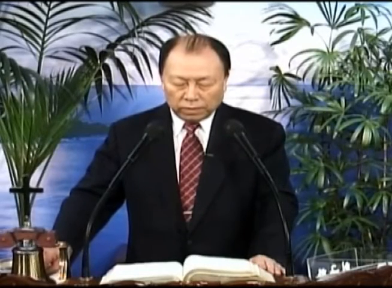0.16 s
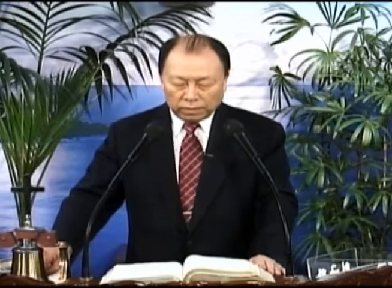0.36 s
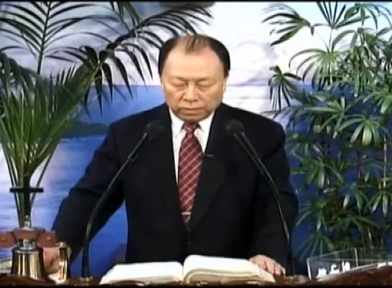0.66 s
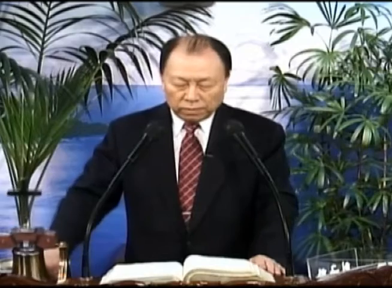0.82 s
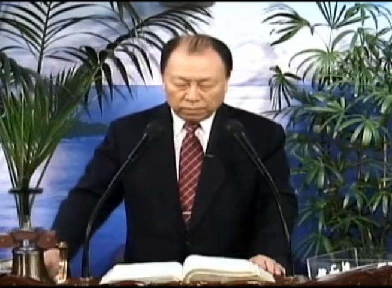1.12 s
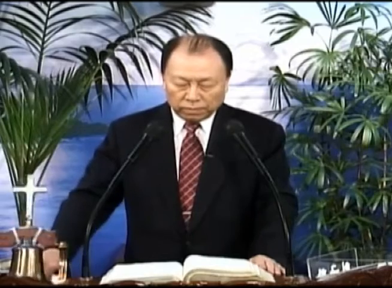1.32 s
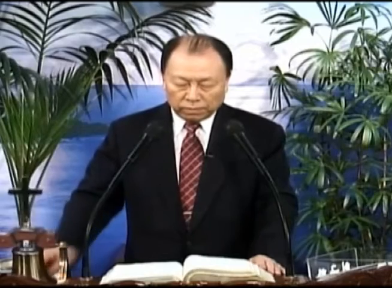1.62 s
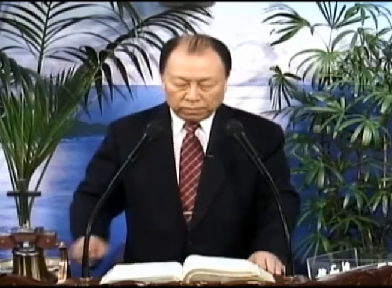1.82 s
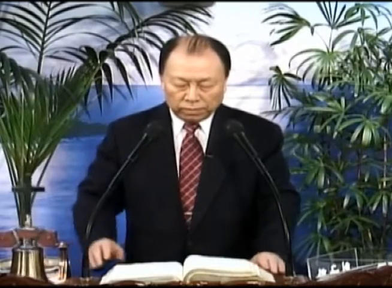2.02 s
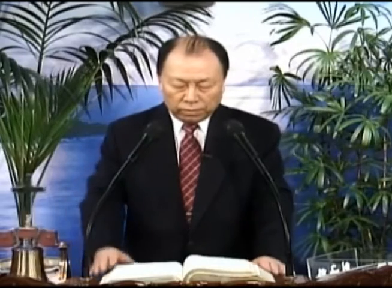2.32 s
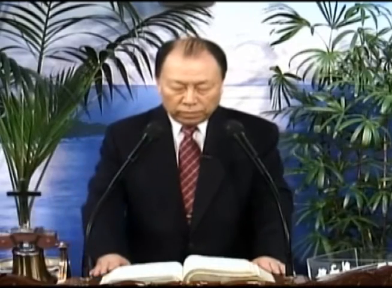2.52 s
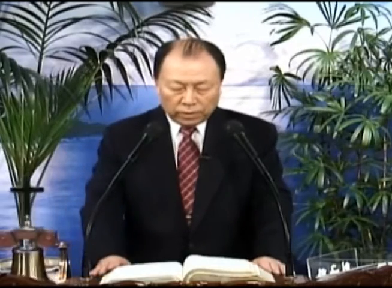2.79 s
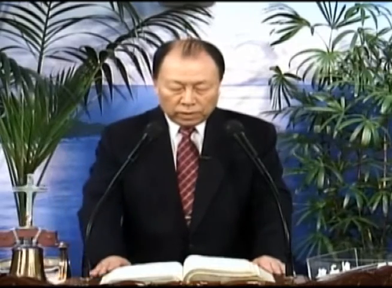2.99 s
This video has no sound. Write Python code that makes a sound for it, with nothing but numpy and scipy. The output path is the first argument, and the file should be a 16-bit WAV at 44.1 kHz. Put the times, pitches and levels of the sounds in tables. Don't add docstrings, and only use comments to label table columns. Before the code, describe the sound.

A small brass hand bell is struck once. Until about 0.8 s there is only faint low electrical buzz and soft hiss, with a barely audible low knock near 0.7. At 0.8 s comes a bright, hard clang, briefly overloaded, with a weak lectern thump. The high clangor fades within a second; a shimmering, beating ring thins out until 3 s, with faint knocks around 1.4-1.5 s and little hall reverberation.

```python
import sys
import numpy as np
from scipy import signal
from scipy.fft import rfft, irfft
from scipy.io import wavfile
from scipy.ndimage import uniform_filter1d

SR = 44100
rng = np.random.default_rng(int(sys.argv[2]) if len(sys.argv) > 2 else 0)


def int16_out(signal):
    q = np.round(np.clip(np.atleast_2d(signal).T, -1, 1) * 32767)
    wavfile.write(sys.argv[1], SR, q.astype(np.int16))


def gain_from_db(level_db):
    decades = np.asarray(level_db, float) / 20
    return 10 ** decades


N = 138915

# f/Hz, level/dB, t60/s
BELL_MODES = [(1175, -55.5, 10.92), (2330, -77.0, 6.34), (2666.4, -55.1, 2.94), (2692.2, -57.8, 5.0),
              (3278.7, -45.1, 3.59), (3675, -32.7, 0.58), (4504, -54.1, 2.67), (4999.6, -30.8, 0.58),
              (5590, -40.3, 0.33), (6004.6, -51.8, 1.26)]
# f/Hz, then for each one level/dB, t60/s
SHORT_MODE_HZ = [6648, 3090, 6916, 11112]
SHORT_MODE_DECAY = [(-44.5, 0.31), (-48.5, 0.17), (-52.5, 0.099), (-61, 0.41)]
# mode number, beat f/Hz, first dip t/s after the blow, share, extra fade/(dB/s)
SPLIT_PARTNERS = [(0, -2.17, 0.059, 0.14, -1.2), (0, -0.62, 1.244, 0.35, 4.9), (0, 3.29, 0.272, 0.94, 9.5),
                  (0, 1.3, 0.667, 0.3, -1.9), (1, -0.88, 0.587, 1.27, 10.5), (2, -2.41, 0.407, 0.37, -5.6),
                  (2, -0.95, 1.004, 0.34, -6.0), (2, -2.98, 0.065, 0.26, 1.2), (3, 1.83, 0.39, 0.13, -6.0),
                  (3, -0.51, 1.283, 0.21, -6.0), (3, 4.93, 0.004, 0.3, 2.4), (4, 4.68, 0.196, 1.6, 59.5),
                  (4, 0.34, 0.238, 1.6, 27.2), (4, 6.04, 0.076, 0.41, -3.0), (5, -1.2, 0.823, 1.6, 33.6),
                  (5, 5.97, 0.164, 0.56, 3.0), (6, -2.76, 0.165, 0.98, 12.4), (6, 2.1, 0.163, 0.99, 4.3),
                  (6, 3.79, 0.203, 0.32, -6.0), (7, 11.55, 0.013, 0.47, 70.0),
                  (7, -2.05, 0.081, 0.19, -6.0), (8, 14.6, 0.047, 0.97, 29.4), (9, 5.18, 0.076, 0.24, -6.0),
                  (9, -13.54, 0.026, 0.61, 25.4)]
# f/Hz, level/dB per Hz
CLANG_COLOUR = [(59, -47), (100, -29.5), (2130, -27), (3610, -19.5), (3930, -31.5), (4860, -15),
                (5280, -17), (15500, -68)]
# f/Hz, level/dB, t60/s
STAND_MODES = [(7181, -14, .6), (7450, -4, .2), (7741, -4, .75), (8400, -11, .45), (2358, 17, .09),
               (8899, -6, .65), (9905, -12, .6), (6562, -22, 3)]
# f/Hz, level/dB per Hz
THUMP_COLOUR = [(50, -23), (80, -2.5), (250, -3), (500, -24), (2500, -36), (5000, -63)]
# t/s, level/dB, f/Hz, width/s
LECTERN_KNOCKS = [
    (0.67, -56, 45, .008),
    (1.4, -57, 45, .008),
    (.82, -67.5, 190, 0.0033),
    (0.25, -78, 1200, .002),
    (1.492, -73.5, 700, .003),
    (1.49, -84, 4500, .0004),
]
# t/s of the step, new value
OFFSET_STEPS = [(0, .096), (.4542, .1028), (.752, .097), (.775, .095), (.7984, .103), (1.0121, .096),
                (1.2671, .1062), (1.4299, .0984), (1.8243, .1079), (2.5215, .0983), (2.8229, .1061),
                (3.0319, .0959)]
# multiple of BUZZ_HZ, level/dB
BUZZ_ORDERS = [(1, -84.5), (2, -65.5), (3, -77), (4, -90)]
# t/s, level/dB
BUZZ_HICCUPS = [(0.223, -72), (0.314, -70), (0.659, -71.5), (1.475, -73), (1.519, -70), (1.722, -76.5),
                (1.752, -69.5), (2.04, -67), (2.11, -70.5), (2.415, -67.5), (2.562, -71.5), (2.636, -70.5),
                (2.97, -71)]
# f/Hz, level/dB per Hz
HISS_COLOUR = [(180, -13.5), (300, -14.5), (610, -6), (663, -13), (708, -9.5), (1970, -12), (2140, -12.5),
               (4140, -15.5), (15500, -30.5)]
WHINE_HARMONICS_DB = [-97, -96, -102, -105, -100]
# f/Hz, level/dB
LINE_WHISTLES = [(12069, -106), (13340, -107), (14935, -107), (15680, -103)]

STRIKE_S, RISE_S = .7817, .00049
BLOW_DB, BLOW_S, BLOW_UNDER_HZ = 6, .048, 5300
BLOOM_S, BLOOM_UNDER_HZ = .024, 3400
DAMP_S, DAMP_DB_PER_S, DAMP_OVER_HZ = 1.2, 18, 4000
CLANG_DB, CLANG_T60_S, CLANG_S = -48, .51, .08
TICK_DB, TICK_T60_S = -46, .03
STAND_DB = -67
HALL_DB, HALL_T60_S = -30, .4
THUMP_S, THUMP_WIDTH_S, THUMP_DB = .7805, .03, -59
CLIP_TOP, CLIP_BOTTOM, CLIP_KNEE = .0195, .032, 4.6
STEP_S, OVERSHOOT = .0135, .12
QUICK_S, QUICK_WITHIN_S = .003, .02
BUZZ_HZ, BUZZ_WAVER_DB = SR / 1024, 1.14
HICCUP_HZ, HICCUP_S = 225, .0025
HISS_DB, HISS_FLICKER_DB = -84.5, .8
HISS_RISE_DB = 4.5
RIPPLE_DB, RIPPLE_HZ, RIPPLE_FROM_HZ = 5, 25, 6000
WHINE_HZ, WHINE_FLICKER_DB, WHINE_DROP_DB = 1015, 6.5, -5


def evened(x):
    return x / np.sqrt(np.mean(x ** 2) + 1e-20)


def coloured(points, ripple_db=0):
    f, db = np.transpose(points)
    hz = np.fft.rfftfreq(N, 1 / SR)
    ripple = evened(uniform_filter1d(rng.standard_normal(len(hz)), size=round(RIPPLE_HZ / hz[1])))
    ripple *= ripple_db * np.clip(hz / RIPPLE_FROM_HZ - 1, 0, 1)
    shape = gain_from_db(np.interp(np.log(hz + 1), np.log(f + 1), db, left=-90) + ripple)
    return evened(irfft(rfft(rng.standard_normal(N)) * shape, N))


def drift(span_s):
    size = round(span_s * SR)
    once = uniform_filter1d(rng.standard_normal(N), size=size)
    return evened(uniform_filter1d(once, size=size))


def since(s):
    return np.maximum(np.arange(N) / SR - s, 0)


def bump(t, centre_s, width_s):
    return np.exp(-.5 * ((t - centre_s) / width_s) ** 2)


def bell():
    t = since(STRIKE_S)
    short_modes = [(hz, *decay) for hz, decay in zip(SHORT_MODE_HZ, SHORT_MODE_DECAY)]
    ring = 0
    for k, (hz, db, t60) in enumerate(list(BELL_MODES) + short_modes):
        beats = 1
        for mode, beat_hz, dip_s, share, fade_db in SPLIT_PARTNERS:
            if mode == k:
                beats = beats - share * gain_from_db(-fade_db * t) * np.exp(2j * np.pi * beat_hz * (t - dip_s))
        if hz < BLOOM_UNDER_HZ and t60 > 1:
            start = 1 - np.exp(-(t / BLOOM_S) ** 2)
        else:
            start = gain_from_db(BLOW_DB * (hz < BLOW_UNDER_HZ) * np.exp(-t / BLOW_S))
        late_db = DAMP_DB_PER_S * np.maximum(t - DAMP_S, 0) * (hz > DAMP_OVER_HZ)
        decay = gain_from_db(db - 60 * t / t60 - late_db)
        tone = np.exp(2j * np.pi * (hz * t + rng.random()))
        ring = ring + (start * beats * decay * tone).real
    clang = gain_from_db(CLANG_DB - 60 * t / CLANG_T60_S) / (1 + (t / CLANG_S) ** 12)
    tick = gain_from_db(TICK_DB - 60 * t / TICK_T60_S)
    return (ring + coloured(CLANG_COLOUR) * (clang + tick)) * np.minimum(t / RISE_S, 1)


def stand():
    t = since(STRIKE_S)
    return sum(gain_from_db(STAND_DB + db - 60 * t / t60) * np.sin(2 * np.pi * hz * t) for hz, db, t60 in STAND_MODES)


def hall(x):
    t = np.arange(SR) / SR
    reflections = rng.choice([-1., 1.], SR) * (rng.random(SR) < .05)
    tail = reflections * gain_from_db(-60 * t / HALL_T60_S) * (t > .01)
    return gain_from_db(HALL_DB) * signal.fftconvolve(x, tail / np.linalg.norm(tail))[:N]


def thump():
    t = since(0)
    out = gain_from_db(THUMP_DB) * coloured(THUMP_COLOUR) * bump(t, THUMP_S, THUMP_WIDTH_S)
    for s, db, hz, width in LECTERN_KNOCKS:
        out += gain_from_db(db) * bump(t, s, width) * np.sin(2 * np.pi * hz * (t - s))
    return out


def overload(x):
    room = np.where(x > 0, CLIP_TOP, CLIP_BOTTOM)
    return x / (1 + abs(x / room) ** CLIP_KNEE) ** (1 / CLIP_KNEE)


def offset():
    t, out = since(0), OFFSET_STEPS[0][1]
    for (_, old), (s, new) in zip(OFFSET_STEPS, OFFSET_STEPS[1:]):
        u = (t - s) / (QUICK_S if abs(s - STRIKE_S) < QUICK_WITHIN_S else STEP_S)
        slide = .5 + .5 * np.sin(np.pi * np.clip(u, -.5, .5))
        swing = OVERSHOOT * np.sign(u) * np.exp(-((abs(u) - .75) / .23) ** 2)
        out = out + (new - old) * (slide + swing)
    return out


def buzz():
    t, out = since(0), 0
    for k, db in BUZZ_ORDERS:
        waver = gain_from_db(db + BUZZ_WAVER_DB * drift(.034))
        out = out + waver * np.cos(2 * np.pi * (int(k) * BUZZ_HZ * t + rng.random()))
    for s, db in BUZZ_HICCUPS:
        out += gain_from_db(db) * bump(t, s, HICCUP_S) * np.sin(2 * np.pi * HICCUP_HZ * (t - s))
    return out


def hiss():
    t = since(0)
    after = t > STRIKE_S
    whine = sum(gain_from_db(db) * np.sin(2 * np.pi * (k + 1) * WHINE_HZ * t) for k, db in enumerate(WHINE_HARMONICS_DB))
    whine *= gain_from_db(WHINE_FLICKER_DB * drift(.02) + WHINE_DROP_DB * after)
    level = gain_from_db(HISS_DB + HISS_RISE_DB * after + HISS_FLICKER_DB * drift(.054))
    whistles = sum(gain_from_db(db) * np.sin(2 * np.pi * hz * t) for hz, db in LINE_WHISTLES)
    return level * coloured(HISS_COLOUR, RIPPLE_DB) + whine + whistles


def scene():
    ring = bell() + stand()
    return (ring + hall(ring))[None]


def top_cut(x):
    return signal.sosfilt(signal.butter(12, 15710, fs=SR, output="sos"), x)


def record(dry):
    mix = overload(dry) + thump() + hiss() + buzz() + offset()
    return top_cut(mix)


dry = scene()
out = record(dry)
int16_out(out)
```